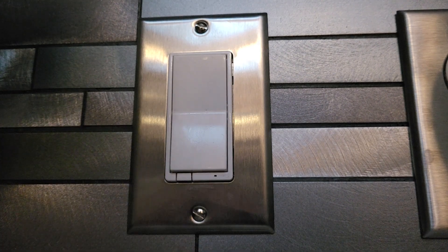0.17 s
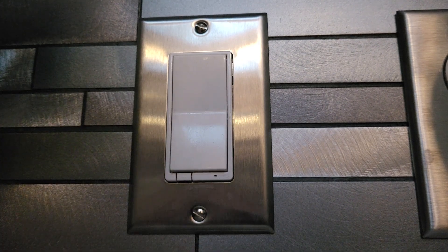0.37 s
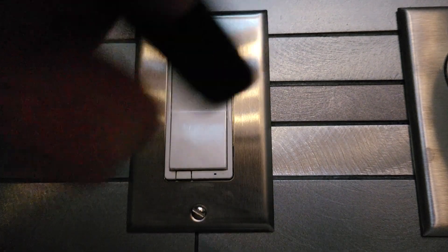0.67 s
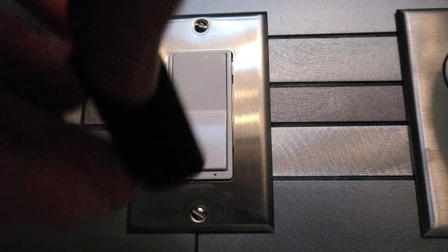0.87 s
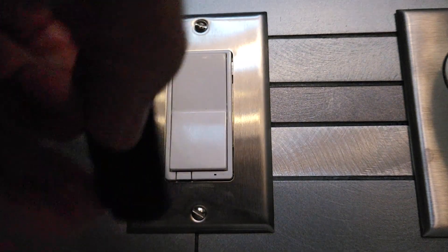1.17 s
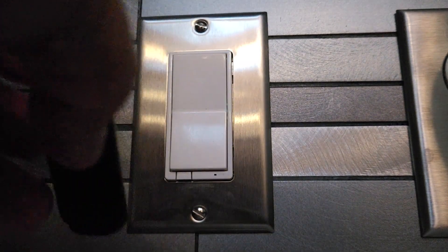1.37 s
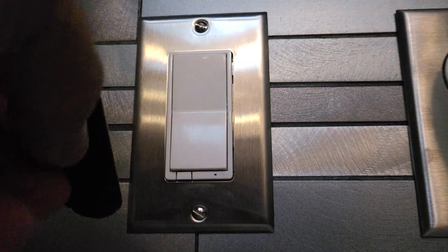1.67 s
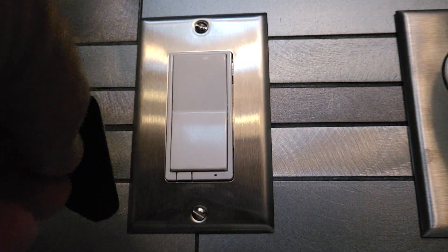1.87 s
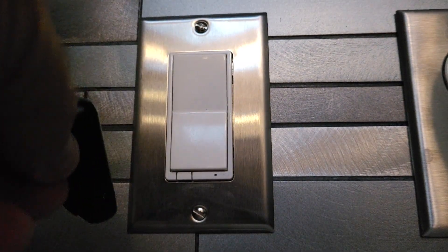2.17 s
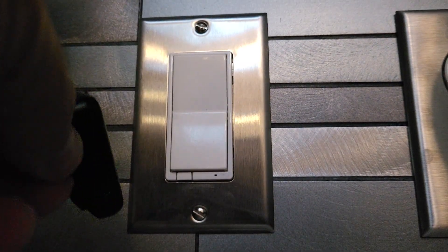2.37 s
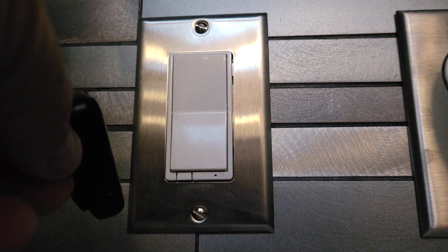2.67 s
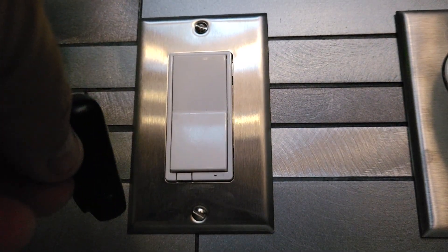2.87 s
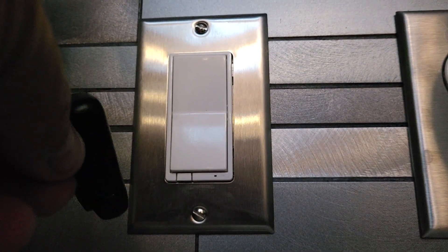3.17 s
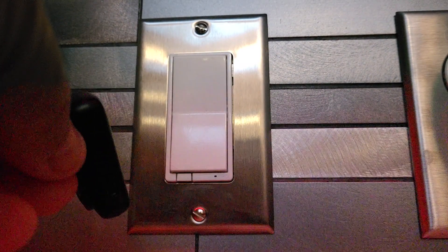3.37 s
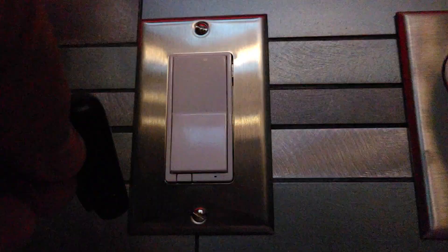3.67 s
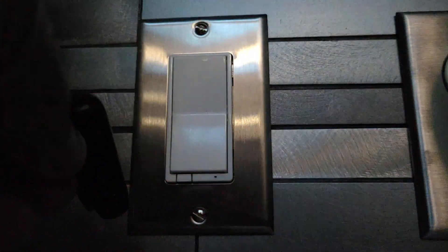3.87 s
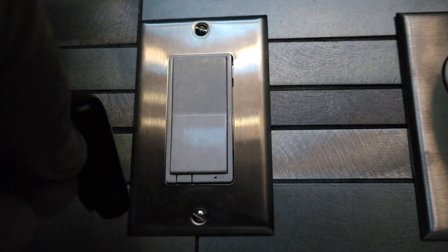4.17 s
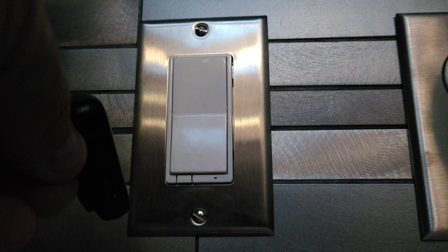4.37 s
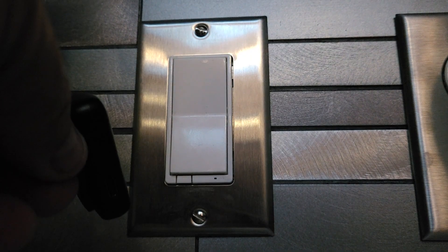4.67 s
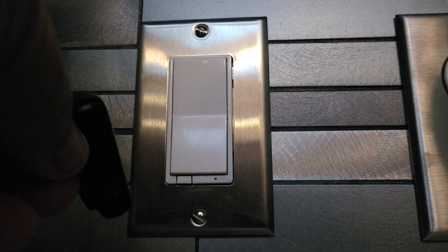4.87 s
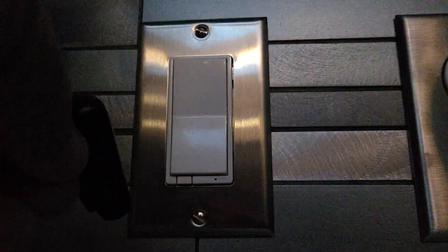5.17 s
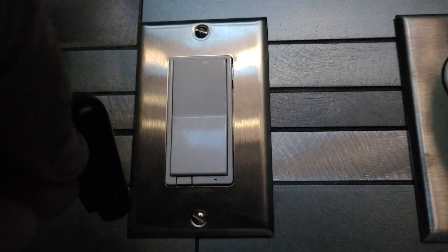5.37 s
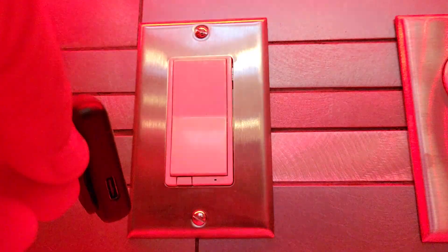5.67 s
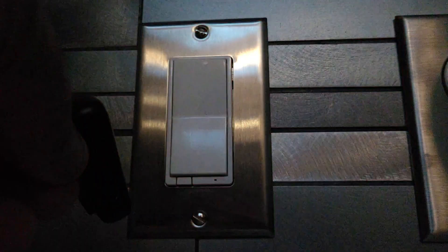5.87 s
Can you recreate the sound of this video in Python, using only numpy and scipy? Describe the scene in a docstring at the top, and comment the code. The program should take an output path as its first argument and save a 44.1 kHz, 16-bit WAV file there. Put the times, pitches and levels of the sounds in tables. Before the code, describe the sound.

Close to the microphone in a small quiet room, a hand brings up a small plastic device with light ticks, hollow knocks and a brushing sleeve. Then a relay in a wall switch clicks by itself five times, about once a second. Each is a bright tick and a clack an instant later, with the steel plate ringing briefly. Faint hiss and dull bumps lie beneath.

```python
"""A relay in a wall switch clicks by itself about once a second, close to the microphone in a small room.
Each click is double: a bright tick as the armature lets go, then a clack about 30 ms later as it lands.
Both are fading housing notes plus a noisy crack; the steel cover plate rings on as slowly swelling notes.
A hand brings up a small plastic device: shaped noise makes its light ticks, hollow knocks and sleeve rustle.
The camera is softly bumped (dull noise thumps), over room air and microphone hiss that drifts by a few dB."""
import sys
import numpy as np
from scipy import signal
from scipy.fft import rfft, irfft, next_fast_len
from scipy.io import wavfile
from scipy.ndimage import uniform_filter1d, map_coordinates

SR = 44100
rng = np.random.default_rng(int(sys.argv[2]) if len(sys.argv) > 2 else 0)


def generate_wav(sig):
    """Save sig (samples, or channels by samples) to the path in sys.argv[1] as 16-bit PCM at SR."""
    pcm = np.round(np.clip(np.atleast_2d(sig).T, -1, 1) * 32767).astype(np.int16)
    wavfile.write(sys.argv[1], SR, pcm)


N = 265261
TIME = np.arange(N) / SR  # seconds since the start
AGE = TIME[:SR // 2]  # seconds since a single sound began

# In all tables, t60 is the time a sound takes to fade by 60 dB.
# room air and microphone hiss over time: (time [s], level [dB])
HISS_LEVEL = [(0, -62.5), (.3, -66), (.7, -60), (1.4, -61), (2.1, -61), (3.4, -64), (4.1, -61.5),
              (6, -62.5)]
# tone colour of that hiss: (frequency [Hz], level [dB])
AIR_COLOUR = [(25, -49), (60, -34.5), (80, -29.5), (105, -6), (140, -2), (200, -6), (400, -9), (750, -11.5),
              (1200, -16), (2100, -20), (3800, -17), (6000, -18), (7000, -22.5), (8000, -28.5)]
# how much of the background differs between the ears: (frequency [Hz], side level [dB])
BACKGROUND_WIDTH = [(30, -16), (100, -27), (300, -12.5), (3000, -13), (7000, -26.5), (10000, -12)]
# how long the room rings: (frequency [Hz], t60 [s])
ROOM_FADE = [(200, 0.32), (1300, 0.2), (3000, 0.19), (7000, 0.19)]
# the microphone's treble roll-off: (frequency [Hz], level [dB])
MIC_TREBLE = [(6900, 0), (7250, -13.5), (7600, -19.5), (8300, -31), (9000, -46.5), (15000, -66.5)]
TOP_HZ = 15700  # nothing is kept above this

# soft bumps on the camera: (time [s], level [dB])
BUMPS = [(2.335, -42), (2.371, -41), (2.868, -46.5), (2.887, -45.5), (2.994, -48.5), (3.023, -46),
         (4.375, -40.5), (4.693, -42.5), (4.727, -42.5), (4.873, -43), (4.932, -34.5), (4.975, -41),
         (5.03, -38), (5.066, -36.5)]
BUMP_T60_S, BUMP_RISE_S = 0.089, 0.014
# the grip shifts on the camera: (start [s], length [s], level [dB])
GRIP_SHIFTS = [(4.27, 0.26, -48.5), (4.68, 0.4, -49.5)]
# their swell and fade: (attack [share of length], sag [dB/s], release t60 [share of length])
GRIP_SHAPE = (0.22, 4, 1.43)
# dull colour of bumps and grip: (frequency [Hz], level [dB])
THUMP_COLOUR = [(25, -38.5), (55, -31), (78, -23), (98, 3), (115, 5), (150, 1.5), (200, -15.5),
                (245, -13.5), (290, -18), (500, -36), (900, -82)]

# the sleeve sweeps past: (start [s], length [s], level [dB])
SLEEVE_SWEEPS = [(.08, 0.044, -58), (.585, 0.023, -54), (.608, 0.033, -40.5), (.657, 0.024, -44),
                 (.718, 0.11, -33.5), (.868, 0.031, -41), (1.05, 0.19, -56.5)]
# their swell and fade: (attack [share of length], sag [dB/s], release t60 [share of length])
SLEEVE_SHAPE = (0.33, 59, 1.8)
# colour of rubbed cloth: (frequency [Hz], level [dB])
CLOTH_COLOUR = [(900, -21), (1600, -16.5), (1900, 3.5), (2150, -6.5), (2550, -7), (3100, 2), (3900, -9),
                (4500, -18), (5200, -5.5), (6000, -32), (8000, -33)]
# the cloth's low flutter: (start [s], length [s], level [dB])
CLOTH_FLUTTERS = [(.77, 0.12, -45.5)]
# its swell and fade: (attack [share of length], sag [dB/s], release t60 [share of length])
FLUTTER_SHAPE = (.3, 11, 3.5)
# colour of the flutter: (frequency [Hz], level [dB])
FLUTTER_COLOUR = [(80, -35), (150, -10.5), (270, 4), (340, -10), (430, 0), (520, -7), (680, -16),
                  (830, 5.5), (1000, -33), (1350, -10.5), (1700, -26.5)]
# fingers slide over the plastic: (start [s], length [s], level [dB])
FINGER_SLIDES = [(.76, 0.09, -46.5), (.865, .2, -42), (1.085, 0.036, -46.5), (1.145, 0.067, -42),
                 (1.76, 0.1, -37.5)]
# their swell and fade: (attack [share of length], sag [dB/s], release t60 [share of length])
SLIDE_SHAPE = (0.063, 36.4, 2.86)
# colour of skin on plastic: (frequency [Hz], level [dB])
SKIN_COLOUR = [(2500, -24.5), (4500, -25), (5600, -19), (6300, -4.5), (6750, -5), (7400, -4.5), (9000, -16)]
# a thin rubbing note: (start [s], length [s], level [dB])
SCRAPES = [(1.06, 0.13, -55.5)]
# its swell and fade: (attack [share of length], sag [dB/s], release t60 [share of length])
SCRAPE_SHAPE = (.1, 8, 1.1)

# light plastic ticks in the hand: (time [s], level [dB], pitch [Hz], width [Hz])
PLASTIC_TICKS = [(0.1219, -24.5, 5040, 900), (.3485, -31.5, 5200, 980), (0.5376, -49, 1900, 3000),
                 (.660, -33.5, 2140, 1390), (.714, -40.5, 2400, 1800), (.774, -27, 3540, 2490),
                 (1.0628, -40, 1700, 2200), (1.193, -32, 5800, 1210), (1.216, -44.5, 1380, 1510),
                 (1.359, -36, 2970, 910), (1.427, -30.5, 5950, 700), (1.495, -38, 5970, 696),
                 (1.5073, -34, 6070, 700), (1.563, -41.5, 5800, 800), (1.748, -22.5, 5200, 2280),
                 (1.7563, -20.5, 6200, 2280), (1.883, -38, 3830, 3000), (1.971, -45, 6540, 2500),
                 (5.475, -43.5, 5462, 2950), (5.508, -34.5, 6700, 506)]
TICK_T60_S, TICK_RISE_S = 0.028, 0.0011
# hollow knocks of the case: (time [s], level [dB])
KNOCKS = [(.1215, -29), (.150, -26.5), (.533, -47), (.772, -30.5), (.80, -34)]
KNOCK_T60_S, KNOCK_RISE_S = 0.1, 0.012
# hollow notes in a knock: (pitch [Hz], width [Hz], level [dB])
HOLLOW_NOTES = [(789, 94, 6.5), (1075, 103, 4.5), (1385, 68, -5)]
# the loose case buzzes with each knock: (pitch [Hz], width [Hz], level [dB])
CASE_RATTLE = [(2360, 750, -20), (5130, 1340, -7)]

# the armature lets go with a tick:
# (time [s], level [dB], treble [dB], rebound [dB], plate [dB])
RELEASES = [(1.6856, 2, -5, 0, -17), (2.584, 3.5, -0.5, -14.5, 1.5), (3.501, 5, -2, -15.5, -3.5),
            (4.4181, 3, -1, -8, -0.5), (5.3344, 8, -1, -8, -2.5)]
# it lands with a clack: (time [s], level [dB], treble [dB], rebound [dB])
LANDINGS = [(1.718, -5.5, 0.5, -14.5), (2.6203, 7, 8.5, -23), (3.5306, -1.5, 2.5, -6.5),
            (4.4485, 2, -1, -7.5), (5.3641, -1.5, 2, -1)]
# notes of the switch housing: (pitch [Hz], t60 [s], level at the tick [dB], level at the landing [dB])
HOUSING_NOTES = [(700, 0.12, -35, -30.5), (840, 0.049, -49, -41.5), (1008, 0.056, -47, -31),
                 (1170, 0.1, -40, -32.5), (1324, 0.11, -41, -25), (1476.6, 0.09, -29, -28.5),
                 (1700, 0.076, -46, -37.5), (2160, 0.058, -41.5, -38), (2420, .07, -31.5, -45),
                 (2510, 0.096, -29, -41.5), (2654, 0.066, -45, -26), (3058, 0.055, -39.5, -23),
                 (3696, .065, -29.5, -32), (4398, 0.07, -33.5, -49), (4862, 0.078, -25.5, -37.5),
                 (5050, 0.057, -32, -41), (5500, 0.065, -30.5, -41.5), (6440, .06, -29, -42.5),
                 (6940, 0.036, -37, -41.5)]
# dense short vibration of the small parts:
# (pitch [Hz], level at the tick [dB], its t60 [s], level at the landing [dB], its t60 [s])
CRACK_BANDS = [(230, -60.5, 0.17, -43.5, 0.19), (444, -47.5, .1, -41, 0.12), (750, -38.5, .1, -33, 0.13),
               (1370, -33.5, 0.087, -23.5, .1), (1890, -46.5, 0.072, -28, 0.065),
               (3040, -30.5, 0.033, -24.5, 0.064), (4230, -34, 0.023, -28.5, .055),
               (5130, -18.5, 0.027, -27, 0.064), (6800, -19, 0.01, -30, 0.054),
               (8300, -17, 0.045, -32.5, 0.032)]
# notes of the cover plate over the wall box: (pitch [Hz], level [dB], t60 [s], swell [s])
PLATE_NOTES = [(380, -30, .17, .012), (402, -18.5, .16, .02), (442, -21.5, .27, .025),
               (472, -14.5, .37, .033), (492, -29, .3, .03)]


def amp(db):
    """Turn decibels into a plain multiplier."""
    return 10 ** (np.asarray(db) / 20)


def unit(x):
    """Scale a sound to an average strength (rms) of 1."""
    return x / np.sqrt(np.mean(x ** 2) + 1e-20)


def along(points, hz):
    """Read a (frequency, value) table at any frequency, on a log axis."""
    f, value = np.transpose(points)
    return np.interp(np.log(hz + 1), np.log(f + 1), value)


def filtered(x, response):
    """Make each frequency of x louder or softer as the response says."""
    size = x.shape[-1]
    padded = next_fast_len(size + 8192)
    spectrum = rfft(x, padded) * response(np.fft.rfftfreq(padded, 1 / SR))
    return irfft(spectrum, padded)[..., :size]


def noise(response, size):
    """Coloured noise of rms 1."""
    return unit(filtered(rng.standard_normal(size), response))


def resonance(f, hz, width):
    """How strongly one damped vibration answers each frequency f."""
    return 1j * f * width / (hz * hz - f * f + 1j * f * width)


def fade(t60, rise):
    """Loudness shape of a struck thing: it builds up, then dies away."""
    decay = np.exp(-np.log(1000) * AGE / t60)
    build_up = 1 - np.exp(-(AGE / rise) ** 2)
    return decay * build_up


def add(track, s, sound):
    """Mix a sound in at s seconds."""
    part = track[round(s * SR):][:len(sound)]
    part += sound[:len(part)]


def level(rows):
    """Multiplier over time from a (time, level) table, silent outside it."""
    s, db = np.transpose(rows)
    curve_db = np.interp(TIME, s, db, left=-120, right=-120)
    return uniform_filter1d(amp(curve_db), size=256)


def hiss():
    """Room air and microphone hiss: noise of one fixed colour whose level drifts by a few dB."""
    return level(HISS_LEVEL) * noise(lambda f: amp(along(AIR_COLOUR, f)), N)


def room(x, build_s=0.072):
    """The room's blurred answer thickens slowly, while each frequency dies at its own speed."""
    hz, t, pieces = signal.stft(rng.standard_normal(len(AGE)), SR, nperseg=256)
    fall_db = -60 * t / along(ROOM_FADE, hz)[:, None]
    tail = signal.istft(pieces * amp(fall_db), SR, nperseg=256)[1][:len(AGE)]
    tail = tail * np.minimum(AGE / build_s, 1)
    return signal.fftconvolve(x, tail / np.linalg.norm(tail))[:N]


def strokes(rows, shape):
    """Rubbing strokes swell, sag and die away; long ones start and stop more slowly."""
    attack, sag_db_per_s, release = shape
    gain = np.zeros(N)
    for s, length, db in rows:
        age = np.maximum(TIME - s, 0)
        sag_db = sag_db_per_s * age
        release_db = 60 * np.maximum(age - length, 0) / (release * length)
        swell = 1 - np.exp(-(age / (attack * length)) ** 2)
        gain = np.hypot(gain, amp(db - sag_db - release_db) * swell)  # overlapping strokes add as power
    return gain


def handling(low_cut_hz=85):
    """Dull bumps and a shifting grip, heard through the camera body, which passes no deep bass."""
    def body(f):
        return amp(along(THUMP_COLOUR, f))

    out = strokes(GRIP_SHIFTS, GRIP_SHAPE) * noise(body, N)
    push = fade(BUMP_T60_S, BUMP_RISE_S)
    push_size = push.std() / push.max()
    for s, db in BUMPS:
        thump = unit(noise(body, len(AGE)) * push)
        add(out, s, amp(db) * thump * push_size)
    return filtered(out, lambda f: f ** 2 / np.hypot(f ** 2, low_cut_hz ** 2))


def friction(spectrum, slips_per_s, smooth_share, clump_db=1.0, clumps_per_s=70):
    """Rubbing: many tiny slips of random size plus a smooth hiss, bunched in clumps; rms 1."""
    slips = (rng.random(N) < slips_per_s / SR) * rng.standard_normal(N)
    # a smooth random curve makes the rubbing stronger and weaker
    grip = map_coordinates(rng.standard_normal(N // 100), [TIME * clumps_per_s], mode="mirror")
    drive = unit(slips) + smooth_share * rng.standard_normal(N)
    drive = drive * amp(clump_db * grip)
    lowest_hz = spectrum[0][0] / 2
    return unit(filtered(drive, lambda f: amp(along(spectrum, f)) * (f > lowest_hz)))


def rustle(scrape_hz=1930, scrape_width_hz=170):
    """The sleeve brushes past and skin slides over the case, briefly catching on one note."""
    cloth = friction(CLOTH_COLOUR, slips_per_s=1100, smooth_share=1)
    low_cloth = friction(FLUTTER_COLOUR, slips_per_s=730, smooth_share=0.77, clump_db=4.5, clumps_per_s=50)
    skin = friction(SKIN_COLOUR, slips_per_s=1000, smooth_share=1.0)
    note = noise(lambda f: resonance(f, scrape_hz, scrape_width_hz) ** 2, N)
    sleeve = strokes(SLEEVE_SWEEPS, SLEEVE_SHAPE) * cloth
    flutter = strokes(CLOTH_FLUTTERS, FLUTTER_SHAPE) * low_cloth
    slide = strokes(FINGER_SLIDES, SLIDE_SHAPE) * skin
    scrape = strokes(SCRAPES, SCRAPE_SHAPE) * note
    return sleeve + flutter + slide + scrape


def ticks(spill_db=-20):
    """Fingers shift on the plastic case: short ticks that all die alike, and a few hollow knocks."""
    out = np.zeros(N)
    for s, db, hz, width in PLASTIC_TICKS:
        def colour(f):
            spill = amp(spill_db) * abs(resonance(f, 1800, 11000))  # faint and very broad
            return abs(resonance(f, hz, width)) ** 2 + spill
        add(out, s, amp(db) * noise(colour, len(AGE)) * fade(TICK_T60_S, TICK_RISE_S))

    def hollow(f):
        return sum(amp(db) * abs(resonance(f, hz, width)) ** 2 for hz, width, db in HOLLOW_NOTES + CASE_RATTLE)

    for s, db in KNOCKS:
        add(out, s, amp(db) * noise(hollow, len(AGE)) * fade(KNOCK_T60_S, KNOCK_RISE_S))
    return out


def blow(modes, bands, treble_db, rise, build_cycles, corner_hz):
    """One impact in the switch: housing notes and a noisy crack; low notes take longer to build up."""
    def tilt(hz):  # treble change, mostly above the corner
        return treble_db / (1 + (corner_hz / hz) ** 4)

    def swell(hz):
        return rise + build_cycles / hz

    out = np.zeros(len(AGE))
    for hz, t60, db in modes:
        # pitch varies a little, and each note starts at any point of its cycle
        cycles = hz * rng.normal(1, 0.0042) * AGE + rng.random()
        gain = amp(db + tilt(hz) + rng.normal(0, 1))
        out += gain * np.sin(2 * np.pi * cycles) * fade(t60, swell(hz))
    # each noise band is strongest at its own pitch and gone at its neighbours'
    centres = [bands[0][0] / 2] + [row[0] for row in bands] + [bands[-1][0] * 2]
    for (hz, db, t60), share in zip(bands, np.eye(len(centres))[1:]):
        peak = list(zip(centres, share))
        band = noise(lambda f: np.sqrt(along(peak, f)), len(AGE))
        out += amp(db + tilt(hz)) * band * fade(t60, swell(hz))
    return out


def chatter(hz=5800, width_hz=2600, peak_s=0.0039, spread_s=0.0023):
    """The contacts scrape apart in one short bright burst."""
    burst = np.exp(-((AGE - peak_s) / spread_s) ** 2)
    return noise(lambda f: abs(resonance(f, hz, width_hz)) ** 2, len(AGE)) * burst


def plate():
    """The steel cover plate takes up the ring slowly: a few low notes that swell and fade."""
    out = np.zeros(len(AGE))
    for hz, db, t60, swell in PLATE_NOTES:
        gain = amp(db + rng.normal(0, 0.29))
        out += gain * np.sin(2 * np.pi * hz * AGE) * fade(t60, swell)
    return out


def relay(rebound_s=0.0135, chatter_db=-22):
    """The armature lets go, then lands; each blow rebounds once, and each release sets the plate ringing."""
    tick_modes = [(hz, t60, db) for hz, t60, db, _ in HOUSING_NOTES]
    tick_bands = [(hz, db, t60) for hz, db, t60, _, _ in CRACK_BANDS]
    clack_modes = [(hz, t60, db) for hz, t60, _, db in HOUSING_NOTES]
    clack_bands = [(hz, db, t60) for hz, _, _, db, t60 in CRACK_BANDS]
    out = np.zeros(N)
    for s, db, treble_db, rebound_db, plate_db in RELEASES:
        tick = blow(tick_modes, tick_bands, treble_db, rise=0.0085, build_cycles=1.4, corner_hz=4000)
        rebound = blow(tick_modes, tick_bands, treble_db - 9, rise=0.0018, build_cycles=3.7, corner_hz=3993)
        add(out, s, amp(db) * tick)
        add(out, s + rebound_s, amp(db + rebound_db) * rebound)
        add(out, s, amp(db + treble_db + chatter_db) * chatter())
        add(out, s, amp(plate_db) * plate())
    for s, db, treble_db, rebound_db in LANDINGS:
        clack = blow(clack_modes, clack_bands, treble_db, rise=0.001, build_cycles=3.3, corner_hz=2010)
        rebound = blow(clack_modes, clack_bands, treble_db, rise=0.001, build_cycles=2.3, corner_hz=2045)
        add(out, s, amp(db) * clack)
        add(out, s + rebound_s, amp(db + rebound_db) * rebound)
    return out


def scene(relay_room_db=-20, hand_room_db=-15, width_db=-12):
    """Everything is close and central; only a trace of room and background differs between the ears."""
    switch = relay()
    hand = ticks() + rustle()
    send = amp(relay_room_db) * switch + amp(hand_room_db) * hand  # what the room hears
    mid = switch + hand + room(send) + handling() + hiss()
    # fresh random draws, so the side sound is unrelated to the middle one
    side_background = filtered(hiss() + handling(), lambda f: amp(along(BACKGROUND_WIDTH, f)))
    side = amp(width_db) * room(send) + side_background
    return np.array([mid + side, mid - side])


def record(dry, floor_db=-95):
    """The microphone rolls off above 7 kHz, and the recorder rounds off the loudest peaks."""
    x = filtered(dry, lambda f: amp(along(MIC_TREBLE, f)))
    x = x / (1 + np.abs(x / 0.93) ** 6) ** (1 / 6)  # peaks bend smoothly towards 0.93
    x = filtered(x, lambda f: 1 / np.sqrt(1 + (f / 8700) ** 60))  # steep cut above 8.7 kHz
    x = x + amp(floor_db) * rng.standard_normal(x.shape)  # faint noise floor
    return filtered(x, lambda f: f < TOP_HZ)


dry = scene()
out = record(dry)
generate_wav(out)
```